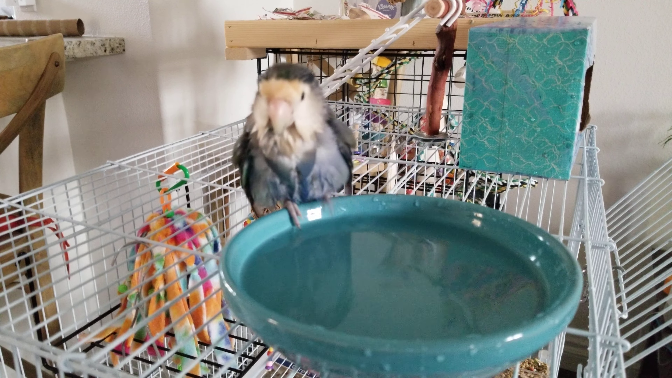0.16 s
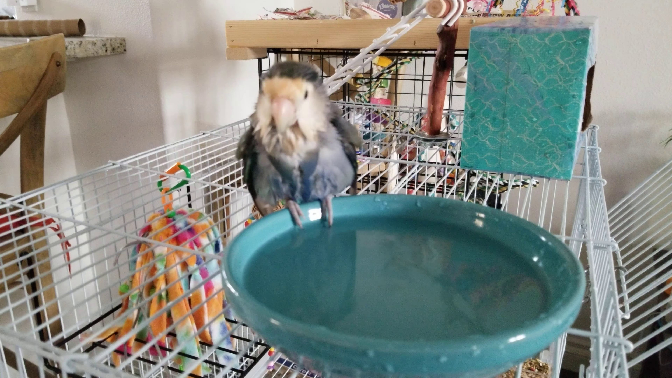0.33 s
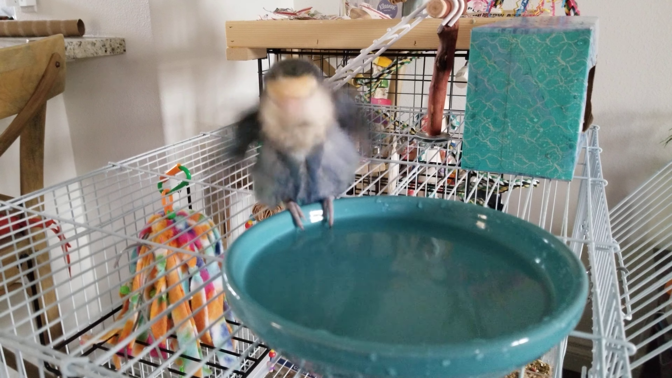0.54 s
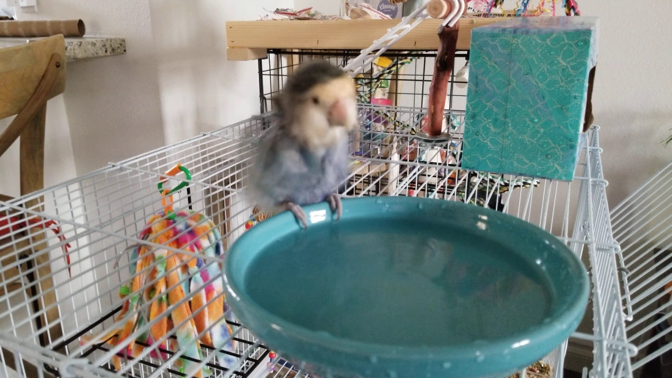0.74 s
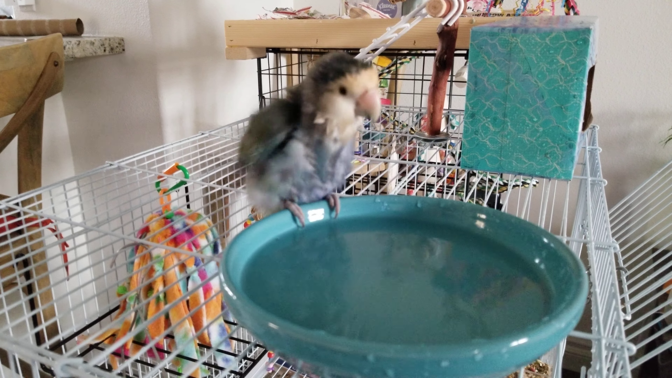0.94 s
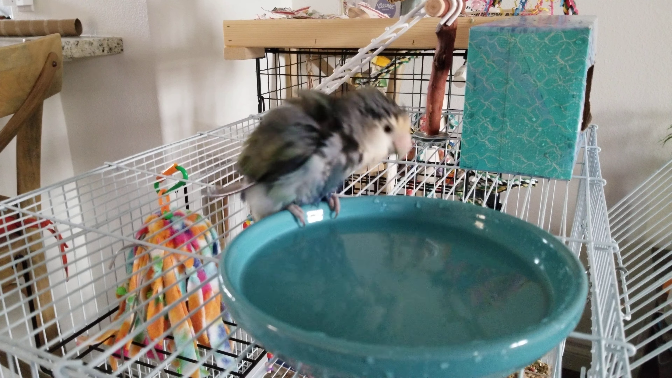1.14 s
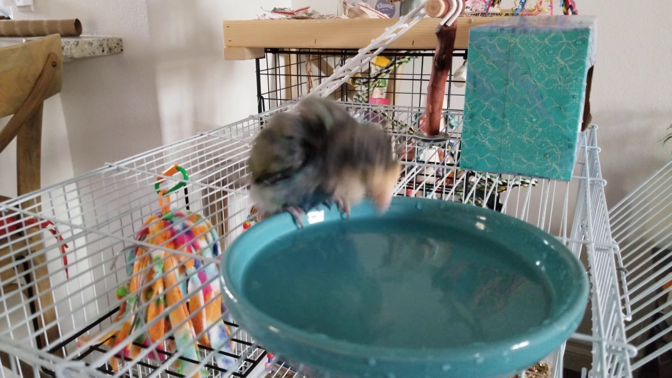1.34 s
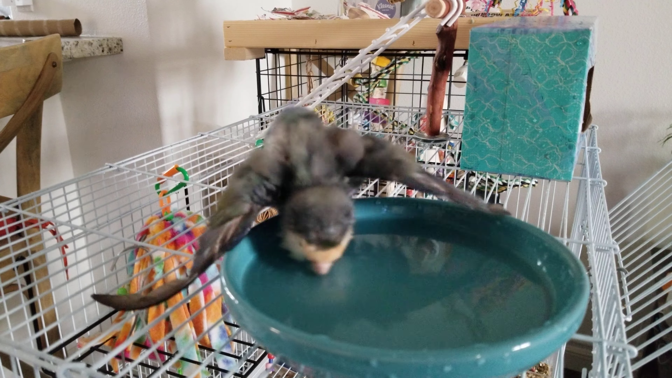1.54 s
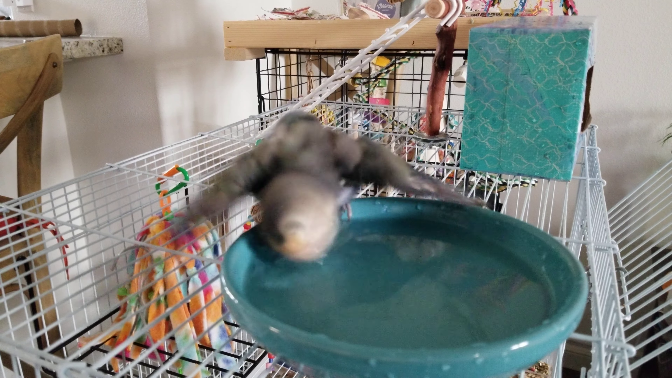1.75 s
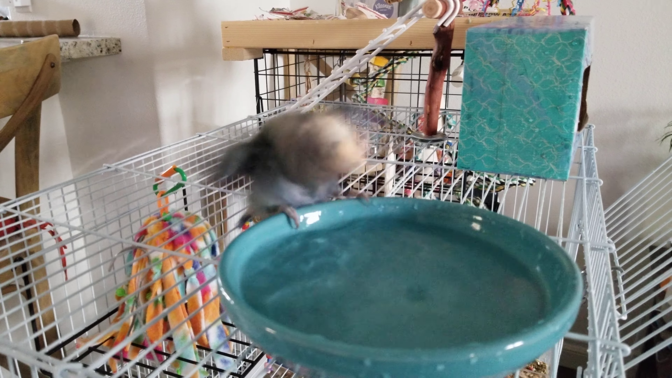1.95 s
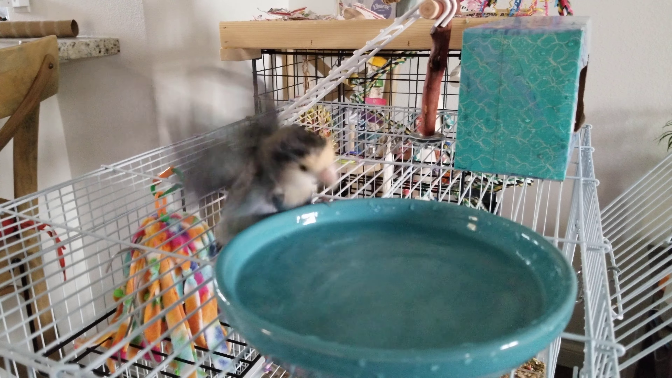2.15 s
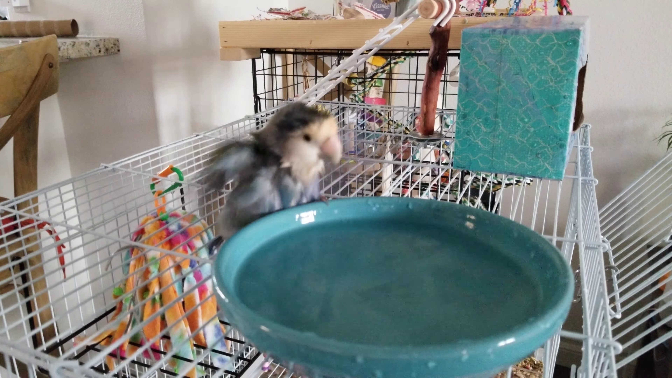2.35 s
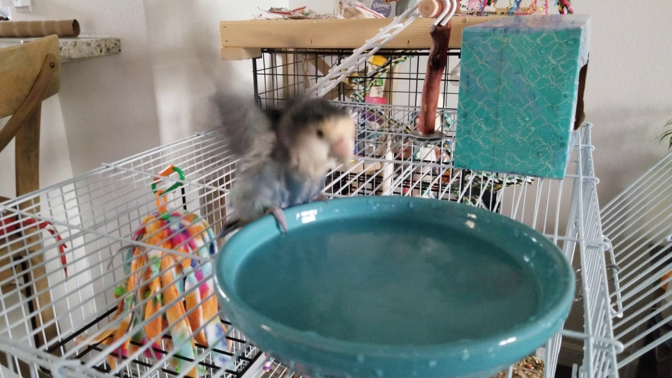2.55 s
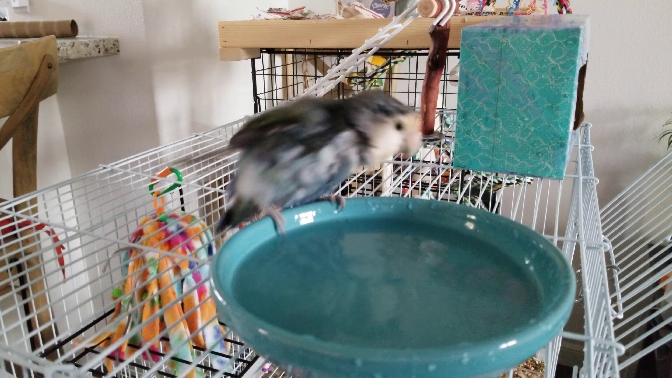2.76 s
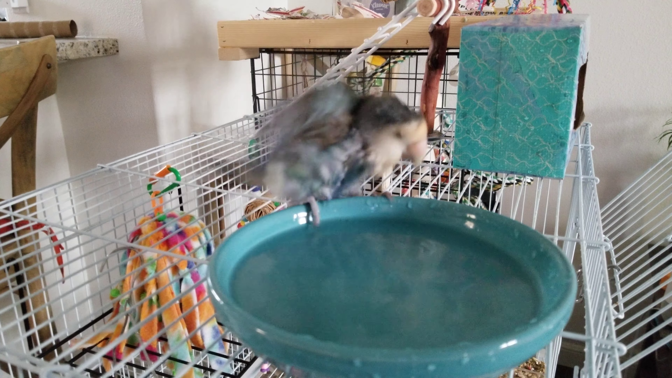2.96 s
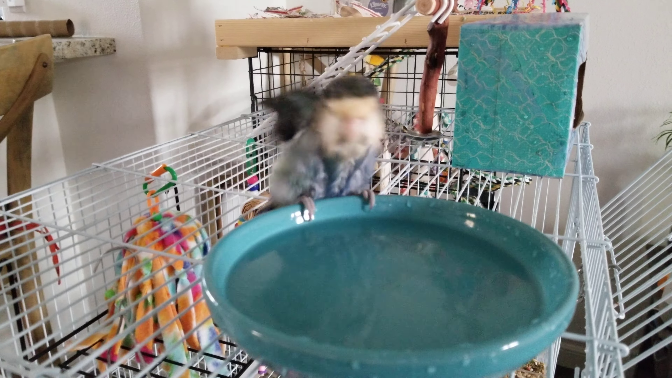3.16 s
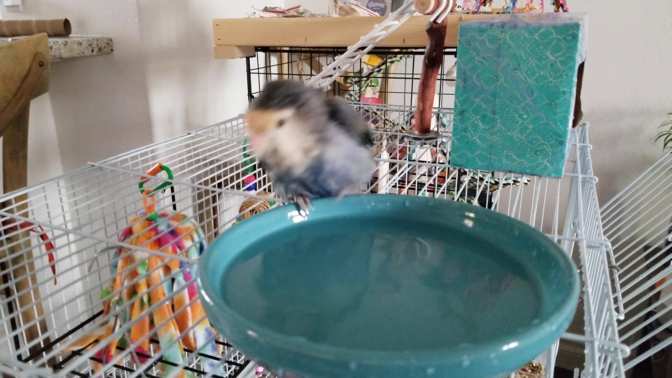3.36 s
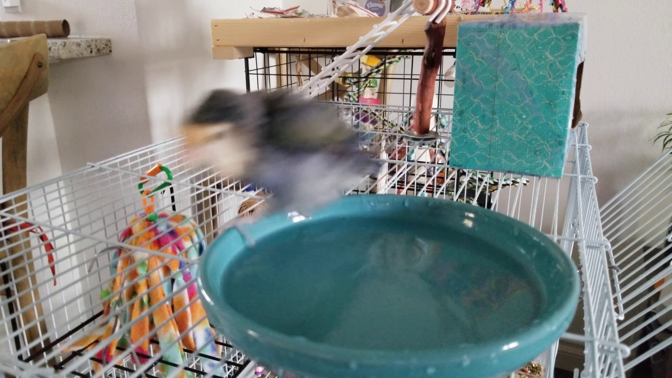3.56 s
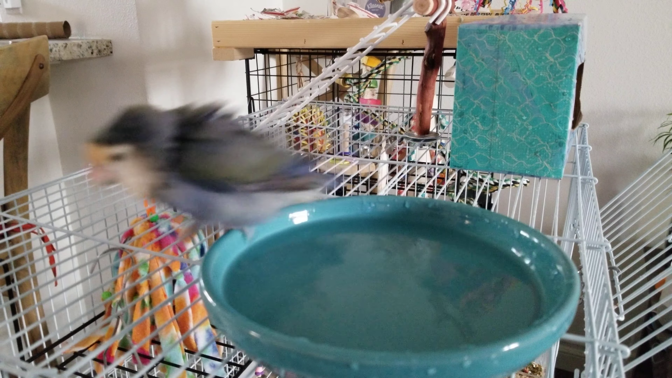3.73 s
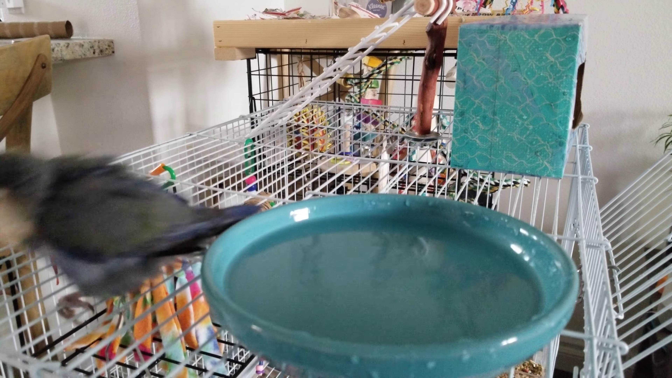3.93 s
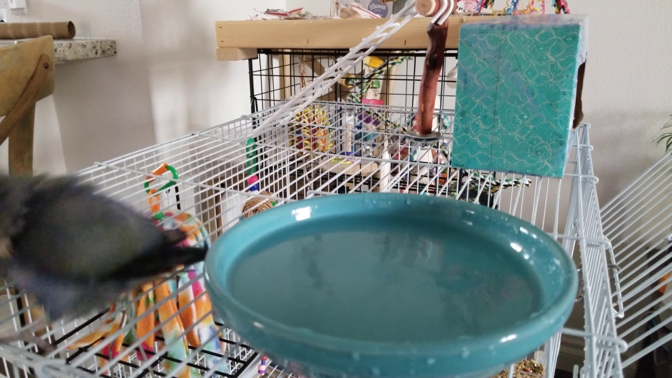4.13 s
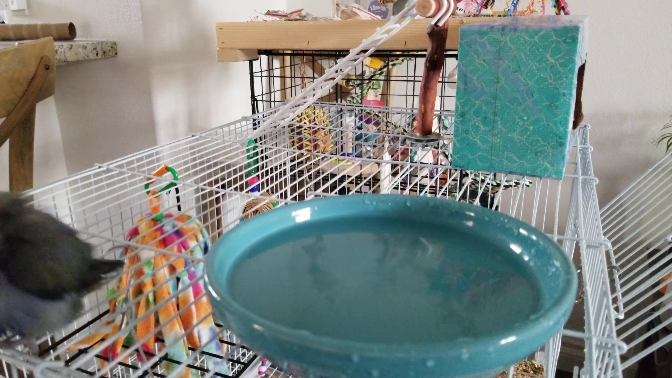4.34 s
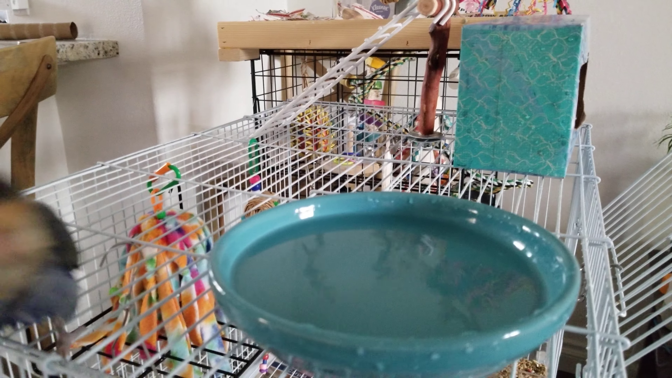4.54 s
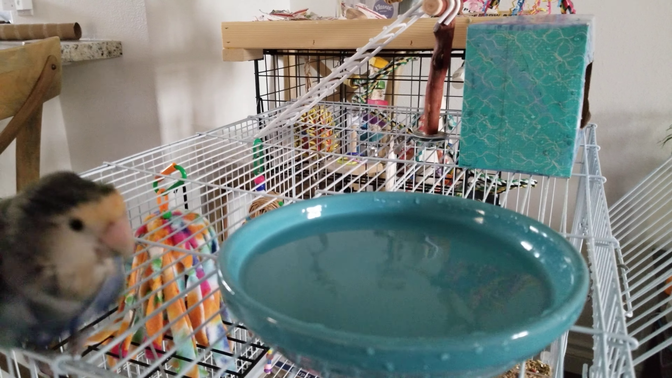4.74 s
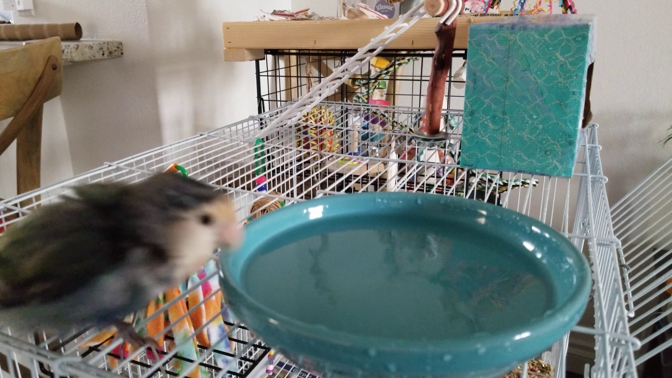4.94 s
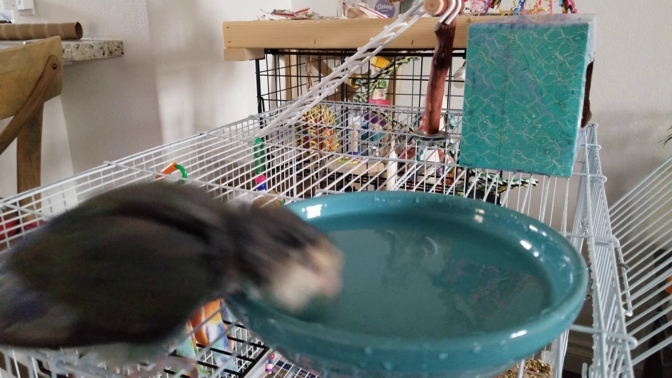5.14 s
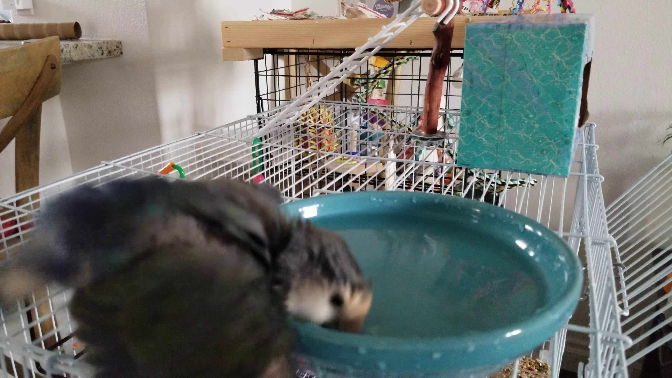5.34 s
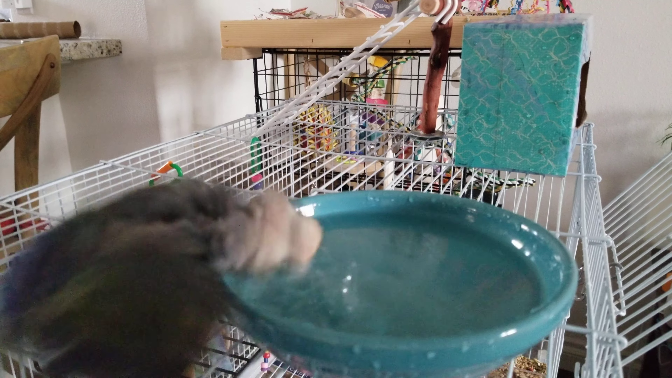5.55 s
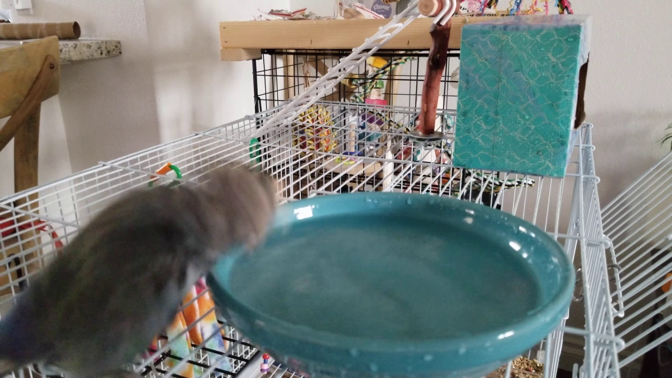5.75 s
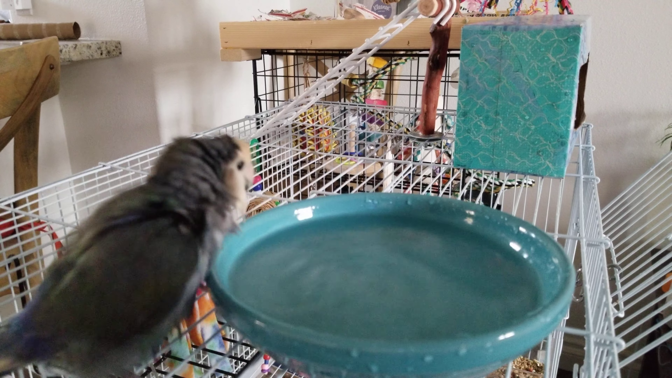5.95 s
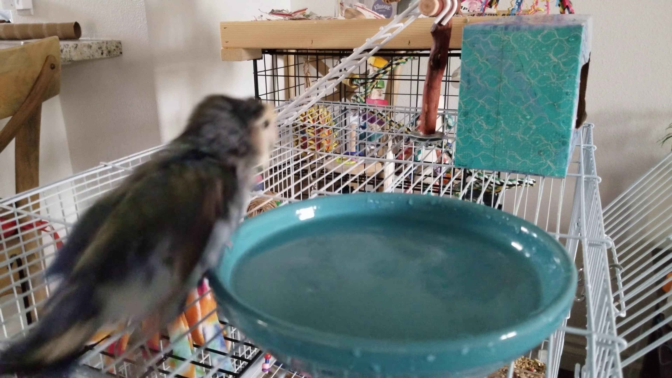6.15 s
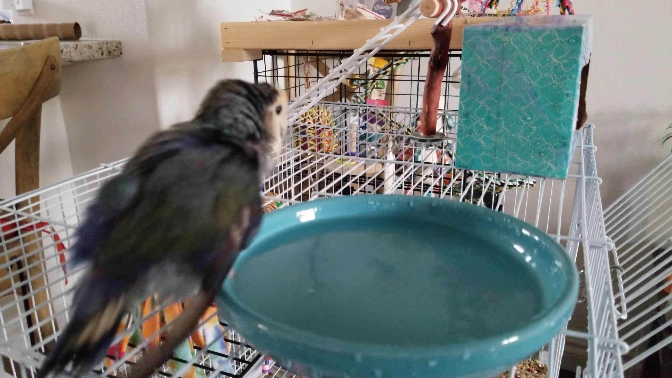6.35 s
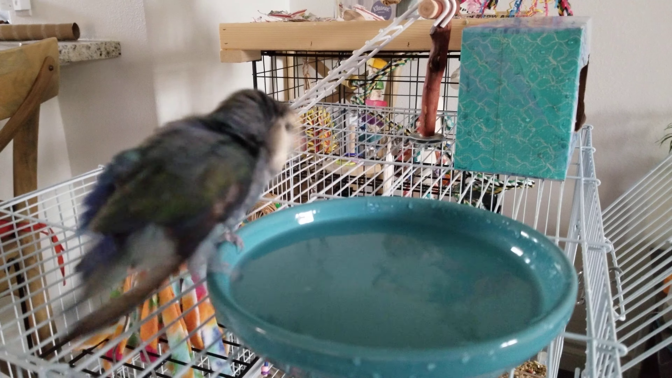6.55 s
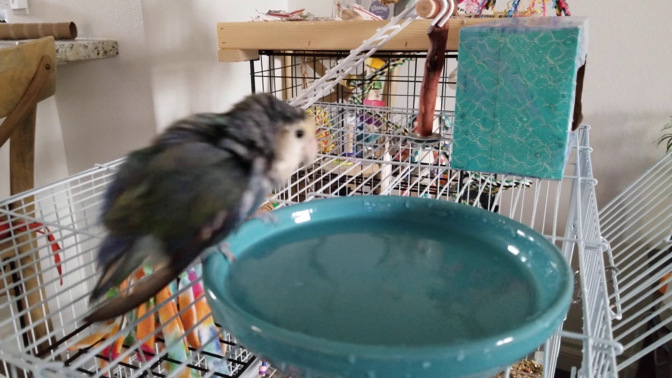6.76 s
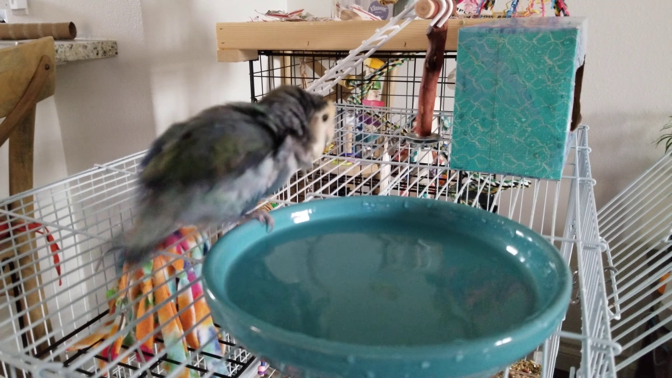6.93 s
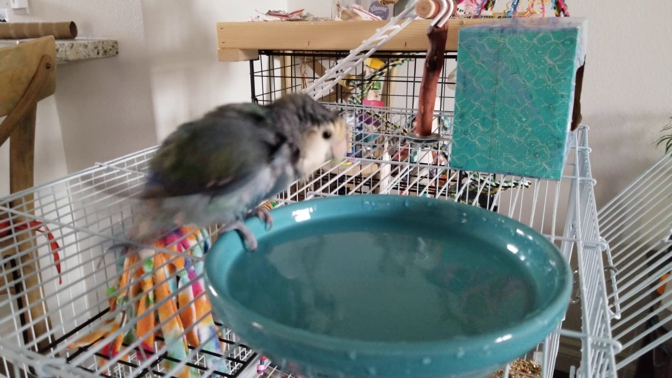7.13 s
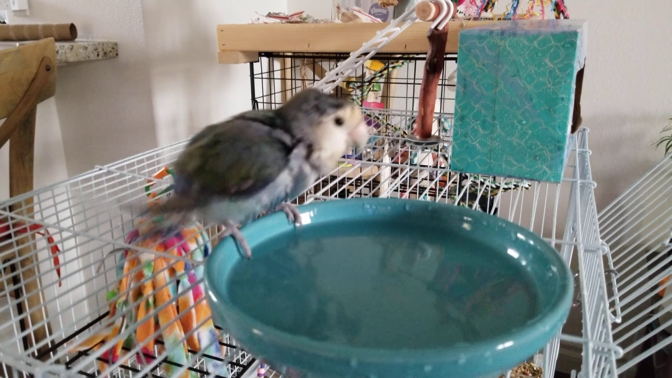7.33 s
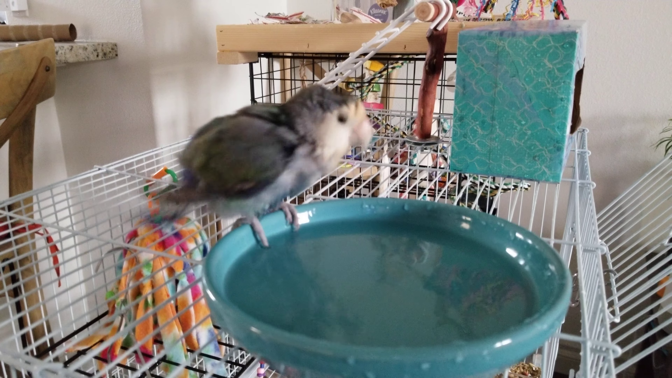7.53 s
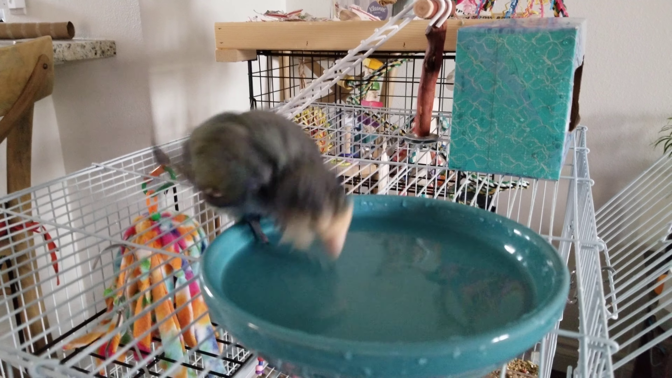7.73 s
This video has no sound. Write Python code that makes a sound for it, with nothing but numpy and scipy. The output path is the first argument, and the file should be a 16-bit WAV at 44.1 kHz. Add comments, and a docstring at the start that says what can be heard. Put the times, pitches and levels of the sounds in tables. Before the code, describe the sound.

Bursts of wet feather rustling and sharp little snaps, with light claw clinks on a ceramic dish and faint traffic rumble indoors.

```python
"""A parrot bathing on a wire cage

A small parrot shakes its wet feathers at a glazed dish on top of a cage. Friction makes the rustle,
wings and drops snap, and claws excite the modes of the dish. The cage wires hum and buzz, and wing wind
thumps on the microphone. Outside a heavy vehicle pulls away through its gears, a thin whistle above it."""
import sys
import numpy as np
from scipy import signal
from scipy.fft import rfft, irfft, next_fast_len
from scipy.io import wavfile

SR = 44100
rng = np.random.default_rng(int(sys.argv[2]) if len(sys.argv) > 2 else 0)


def wav_record(signal):
    """Record a signal, one row per channel, as 16-bit PCM in the file named by sys.argv[1]."""
    frames = np.transpose(np.atleast_2d(signal))
    bounded = np.clip(frames, -1, 1)
    # unit amplitude maps onto the largest positive 16-bit level
    quanta = np.round(bounded * 32767).astype(np.int16)
    wavfile.write(sys.argv[1], SR, quanta)


N = 347949
BASS_LEFT_DB = 5.3   # left over right, for cage hum, wind and background
PORT_LAG_S, ROOM_T60_S = 35e-6, 0.14   # lag of the right microphone port; reverberation time

# Bouts of shaking, bathing and shuffling. Each row: start and length in seconds, then in dB the bright
# rustle, middle rustle, dull wing rush, left over right, shaking of the cage and wind thump.
BOUTS = [(0.154, .2, -78.5, -84.5, -93, 8, -78, -78), (0.591, 0.16, -50, -66, -60, 1, -56, -48),
         (0.715, 0.12, -54.5, -59.5, -56.5, 5, -43, -49.5), (1.26, 0.25, -66.5, -73, -80, 5.5, -67.5, -68),
         (1.82, 0.3, -55.5, -64.5, -69, 4, -49.5, -57.5), (2.077, 0.081, -53.5, -57, -56, 4, -52.5, -53),
         (2.363, 0.02, -54.5, -65, -63, 3, -55, -56), (2.442, 0.071, -48.5, -57, -54.5, 4.5, -45.5, -46.5),
         (2.613, 0.094, -64, -59.5, -63.5, 1, -53.5, -76), (2.97, 0.14, -58.5, -69.5, -66, 4, -57.5, -56),
         (3.943, 0.15, -73, -74, -75, 5, -60, -66), (4.825, .04, -66, -77.5, -83, 4, -69, -60),
         (4.94, 0.046, -71, -72, -84, 4, -74, -68), (5.251, 0.017, -55, -63.5, -64.5, 7.5, -61, -51.5),
         (5.571, 0.15, -57.5, -67, -73, 14, -62, -57), (5.738, .07, -65, -69.5, -68, -4, -56.5, -63),
         (5.98, 0.053, -56.5, -66, -64.5, 6, -59.5, -55), (6.11, 0.14, -63, -62, -75.5, 2.5, -94, -88),
         (6.37, 0.029, -60, -62, -74, 3, -87, -85), (6.872, 0.35, -61, -77.5, -83.5, 5, -84, -61),
         (7.264, 0.94, -60, -74.5, -80, 5, -79, -61)]
def bout_levels(part):
    """Incoherent sources add in power: the dB curve of one part over all bouts, or their balance."""
    start, length, *columns = np.transpose(BOUTS)
    part_db = dict(zip(("bright", "middle", "dull", "left", "shake", "thump"), columns))
    t = np.arange(0, N, 64)[:, None] / SR
    rise, fall, settle = 313, 98, 19.5   # dB per second
    after_db = -np.inf if part in ("shake", "thump") else -14   # only feathers and water settle slowly
    early, late = np.maximum(start - t, 0), np.maximum(t - start - length, 0)
    shape_db = np.maximum(-fall * late, after_db - settle * late) - rise * early
    if part == "left":
        level_db = np.average(part_db["left"] + 0 * t, axis=1,
                              weights=amp(2 * (part_db["bright"] + shape_db)))
    else:
        level_db = 10 * np.log10(amp(2 * (part_db[part] + shape_db)).sum(axis=1))
    return np.interp(np.arange(N) / SR, t[:, 0], level_db)

# Spectra of rustle and wing rush. Each row: frequency in Hz, relative spectral density in dB.
BRIGHT_SPECTRUM = [(5000, -18.5), (8500, -12), (8840, -19), (9610, -15), (12400, -2.5), (15200, -10),
                   (15800, -29)]
MIDDLE_SPECTRUM = [(2000, -13), (3200, -3.5), (4500, 2.5), (6500, -1.5), (8000, -3.5), (9500, -5.5)]
DULL_SPECTRUM = [(400, -1), (800, -3.5), (1500, -1), (2500, -1), (3600, -13.5)]
def feathers():
    """Friction noise: wet feathers rub and shed drops, and all bands flicker together as barbs catch."""
    bright_db, middle_db, dull_db, left_db = map(bout_levels, ("bright", "middle", "dull", "left"))
    catch_db = 2.4 * drift(29.4)
    bright = amp(bright_db + catch_db) * coloured(BRIGHT_SPECTRUM, grains(9000, spread_db=4))
    middle_gain = amp(middle_db + catch_db + 0.5 * drift(1.2))
    middle = middle_gain * coloured(MIDDLE_SPECTRUM, grains(5000, spread_db=3.5))
    dull = amp(dull_db + 0.54 * catch_db + 1.54 * drift(67)) * noise(DULL_SPECTRUM)
    drops = amp(middle_db - 12) * droplets()
    return pan(bright + middle + drops, left_db) + dull

def droplets():
    """Impact ringing: flung drops tick on glaze and wire, a few cycles at one of eight pitches; rms 1."""
    clicks = grains(700, spread_db=6)[0]
    pitch_index = rng.integers(0, 8, N)
    pitches_hz = np.geomspace(2600, 8000, 8)
    ticks = sum(ring(clicks * (pitch_index == k), hz, t60=7.3 / hz) for k, hz in enumerate(pitches_hz))
    return unit_rms(ticks)

# Snaps of wings, drops and feet. Each row: time in seconds, treble peak in dB, then in dB middle over
# treble, low over treble, left over right, bright swish over treble, darker swishes over their bands.
SNAPS = [(0.1281, -45, -31, -29, -4, -23, -11), (0.5556, -15, -12.5, -18.5, 11, -30, -32),
         (0.6041, -25, -21, -21, 10, -40, -28), (0.6393, -13, -8, -12, 9, -27, -26),
         (0.6842, -9.5, 0, -17, 5, -20, -44), (0.6847, -9.5, -33, -13.5, 13, -32, -19.5),
         (0.7263, -22, -16, -9.5, 9, -17, -21), (0.7706, -7, -10, -12.5, 12.5, -27, -32.5),
         (0.8228, -14.5, -11, -11.5, 11, -24, -26), (1.475, -20.5, -13.5, -23, 11, -27, -37),
         (1.6388, -44, -24, -22, 8, -18, -13), (1.7352, -23.5, -13.5, -34, 15, -23, -20),
         (1.767, -28, -13, -24, 23, -37, -18), (1.7945, -13.5, -25, -40, 14, -34, -14),
         (1.7972, -34, 11, -5.5, 6, -26, -27), (1.8283, -28.5, -10, -23, 13, -16.5, -25),
         (1.8834, -31.5, -11, -33, 7, -8, -15), (1.9368, -27, -12, -15, 21, -26, -21),
         (1.9435, -33, -12, -26, 18, -25, -19), (2.002, -39.5, -12, -8, 16, -29, -25),
         (2.0113, -41, 5.5, -6, 9, -17, -20), (2.1778, -20.5, -8, -10, 16, -33, -30),
         (2.2954, -33, 1, -19, 7, -19, -33), (2.3273, -40, 5, -1, 5, -15, -11.5),
         (2.3748, -38, 4.5, -1, 5, -13, -13), (2.4285, -34.5, 9, -3, 6, -18, -27),
         (2.4565, -31, -2, -4.5, 7, -34, -25), (2.5203, -6.5, -13.5, -18, 15, -45, -28),
         (2.5526, -37.5, 10, -17, 10, -15, -27), (2.6467, -44, 9, -0.5, 7, -11, -12),
         (2.9709, -33.5, -16, -27, 23, -19, -13), (3.7495, -52.5, -18, -20, 17, -10, -23),
         (3.9216, -51, -13, -5, 15, -9, -17), (4.0655, -44.5, -21, -31, 13, -5.5, -18),
         (4.1816, -47.5, -2.5, -11, 15, -24, -22), (4.2877, -46, -22, -26, 17, -19, -10),
         (4.3924, -48, -3.5, -10, 34, -23, -32), (4.7042, -48, -16, -19, 17, -12, -12),
         (4.8091, -46.5, -21, -17, 11, -8, -18), (4.9276, -36.5, -17, -39, 12, -17.5, -10),
         (5.0286, -45, -17, -23, 13, -16, -14), (5.2043, -57, 8.5, 7.5, 9, -19, -28),
         (5.2514, -11, -13, -24, 15, -33, -31), (5.3747, -38.5, -7, -7, 16, -25, -16),
         (5.457, -39.5, -11, -34, 12, -25, -13), (5.4783, -38, -11, -28, 10, -14.5, -17),
         (5.5427, -24, -26, -33, 8, -35, -25), (5.5667, -31, -10, -28, 22, -21, -17.5),
         (5.6132, -37, -14, -9, 18, -14, -16), (5.6547, -29, -11, -25, 19, -21, -26),
         (5.6953, -28.5, -10, -21, 19, -29, -22), (5.7799, -40, -1, 0.5, 12, -19, -19.5),
         (5.828, -41, -7, -4, 19, -35, -23), (5.8529, -41.5, -12, -9, 12, -34, -14),
         (5.969, -18, -23, -33, 20, -18, -16), (5.979, -11.5, -14.5, -27, 18, -40, -42),
         (5.9931, -36, -2, -9, 11, -21, -20), (6.0185, -36, 8.5, -7, 7, -20, -28),
         (6.0499, -42.5, 4, -5, 7, -7.5, -17), (6.158, -47, 3, -18, 3, -26, -31),
         (6.1886, -49.5, 2, -10, 6, 0, -14), (6.223, -43, 2, -22, 8, -14, -19),
         (6.3502, -51, 9.5, -17, 6, -23, -26), (6.3665, -39.5, 8.5, -31, 2, -12.5, -26),
         (6.8697, -38, -15, -27, 19, -14, -20), (7.0209, -35, -21, -25, 14, -21, -16),
         (7.069, -41, -17, -20, 12, -16, -20), (7.12, -36, -18, -27, 16, -23, -14),
         (7.1686, -45, -10, -18, 13, -19, -23), (7.2205, -44, -17, -24, 14, -17, -15),
         (7.2585, -34.5, -21, -35, 4, -17.5, -11), (7.3208, -44, -24, -31, 8, -26, -16),
         (7.8266, -43.5, -5, -4.5, 5, -18, -14)]
def snaps():
    """A brief impulse is broadband: a click with spatter in three bands, then a swish of reverberation."""
    times, treble_db, middle_over, low_over, left_db, bright_swish, dark_swish = np.transpose(SNAPS)
    middle_db, low_db = treble_db + middle_over, treble_db + low_over
    direct, t = np.zeros((2, N)), np.arange(600) / SR
    spatter = 0.5 * rng.standard_normal((len(times), len(t))) * np.exp(-t / 0.0005)
    bursts = (t == 0) + spatter
    bands = (([11000, 15000], treble_db, 1), ([3000, 7500], middle_db, 0.4), ([700, 3000], low_db, 0.1))
    for band_hz, level_db, sideways in bands:   # long waves diffract and reach both ports nearly alike
        shaped = signal.sosfilt(signal.butter(2, band_hz, "band", fs=SR, output="sos"), bursts)
        shaped /= np.abs(signal.hilbert(shaped)).max(axis=1, keepdims=True)
        for at, burst, db, left in zip(np.round(times * SR).astype(int), shaped, level_db, left_db):
            direct[:, at:at + len(t)] += pan(amp(db) * burst, sideways * left)
    bright = reverberation(strikes(times, treble_db + bright_swish), BRIGHT_SPECTRUM)
    middle = reverberation(strikes(times, middle_db + dark_swish), MIDDLE_SPECTRUM)
    dull = reverberation(strikes(times, low_db + dark_swish + 0.5), DULL_SPECTRUM)
    return direct + pan(bright, left_db=7.1) + pan(middle, left_db=2.3) + dull

# Claws landing on the rim. Each row: time in seconds, then the drive in dB of five families of modes:
# deep, broad, clear, sharp and thin.
CLAW_STRIKES = [(0.1194, -86, -94, -77, -79, -54), (0.229, -97, -80, -68, -72, -58),
                (0.635, -63, -58, -69, -52, -44), (0.684, -62, -59, -37.5, -45, -37),
                (0.771, -50, -62, -47, -44, -41), (0.8218, -61, -70, -41.5, -72, -57),
                (1.104, -88, -84, -61, -92, -88), (1.138, -107, -86, -61, -83, -52),
                (1.3123, -93, -88, -73, -62, -66), (1.3665, -81, -71, -57, -80, -37),
                (1.4113, -78, -66, -66, -68, -61), (1.472, -72, -62, -67, -81, -67),
                (1.8383, -69, -60, -70, -49.5, -64), (1.885, -63, -54, -44, -47, -36),
                (2.049, -48, -50.5, -45, -59, -50), (2.066, -55, -50.5, -45, -43.5, -29.5),
                (2.0974, -72, -48.5, -61, -44.5, -45), (2.454, -68, -71, -62, -55, -60),
                (2.6304, -63, -58, -57, -58, -38), (2.865, -65.5, -62, -48.5, -62, -49),
                (2.951, -80, -69, -55.5, -61, -47), (3.011, -75, -87, -54, -58, -37),
                (3.11, -88, -64, -62, -60.5, -49), (3.438, -100, -91, -83, -74, -79),
                (3.574, -79, -78, -62, -52, -46), (3.6384, -93, -75, -62, -64.5, -47),
                (3.7933, -82, -95, -77, -63, -52), (4.069, -89, -70, -85, -84, -72),
                (4.81, -88, -83, -73, -61, -68), (5.279, -72, -69, -54, -61, -51),
                (5.475, -86, -87, -65, -70, -80), (5.612, -81.5, -71, -58, -54.5, -48),
                (6.1, -76, -60, -47, -49, -39), (6.1925, -74, -66, -46.5, -48.5, -34.5),
                (6.272, -99, -66, -55, -55, -41), (6.396, -90, -62, -67, -57.5, -47),
                (6.6302, -79, -60.5, -55, -53, -41), (6.6433, -77, -63, -66, -66, -42),
                (6.755, -99, -75, -64, -74, -70.5), (6.7894, -103, -86, -68, -63.5, -48),
                (7.0724, -82, -70, -62, -62, -63), (7.2624, -85, -92, -60, -63, -48),
                (7.337, -87, -84, -65, -76, -48), (7.4058, -100, -83, -64, -70, -49),
                (7.74, -76, -77, -55, -56.5, -70), (7.828, -64, -51.5, -60, -57, -56)]
# Modes of the dish. Each row: frequency in Hz, gain in dB, time to decay by 60 dB in seconds.
DISH_MODES = [(1843, 3, .16), (3120, 0, .15), (4163, 0, .11), (4963, 3, .14), (6557, 0, .12),
              (7192, -5, .1), (8158, -10, .1), (9177, 0, .11), (10260, -18, .08), (10740, -18, .08),
              (11780, -11, .1), (12080, -5, .09), (12480, -12, .09), (13040, -17, .09), (14640, -16, .08),
              (15270, -2, .1), (15660, -8, .09)]
# Each entry: the column of CLAW_STRIKES that drives the corresponding mode.
MODE_FAMILY = [1, 2, 3, 2, 4, 4, 4, 4, 5, 5, 5, 5, 5, 5, 5, 4, 4]
def dish_clinks():
    """Modal vibration: where a claw lands sets each mode's strength; slopping water makes it waver."""
    claws, direct = np.array(CLAW_STRIKES), np.zeros(N)
    touch_s = 0.025   # the claw slides a moment, so the ring swells
    scatter_db = 2 * rng.standard_normal((len(claws), len(DISH_MODES)))
    wavers = [amp(2.2 * drift(40)) for _ in range(3)]
    for k, (hz, gain_db, t60) in enumerate(DISH_MODES):
        drive_db = claws[:, MODE_FAMILY[k]] + scatter_db[:, k] + gain_db
        touch = ring(strikes(claws[:, 0], drive_db), hz, touch_s) / decay_energy(touch_s)
        direct += wavers[k % 3] * ring(touch, hz, t60)
    reflected = reverberation(direct, [(1000, 0.019), (16000, 0.004)]) / np.sqrt(decay_energy(ROOM_T60_S))
    return pan(direct, left_db=5) + amp(-8) * reflected

# Landings and steps on the cage top. Each row: time in seconds, level in dB.
FOOTFALLS = [(3.755, -70), (3.924, -60), (3.97, -77), (4.065, -88), (4.929, -107), (5.03, -77)]
# Resonances of short wires and clips. Each row: frequency in Hz, bandwidth in Hz, gain in dB.
RATTLE_MODES = [(806, 550, 2), (1273, 100, -1), (1694, 110, -15), (2900, 59, -10), (4600, 550, -13.5),
                (6980, 96, -9.5), (10100, 290, -10)]
def wire_rattle():
    """Repeated collisions: a footfall sets loose wires buzzing against each other as the motion decays."""
    t60 = 0.77
    envelope = signal.lfilter([1], [1, -amp(-60 / (t60 * SR))], strikes(*np.transpose(FOOTFALLS)))
    contacts = grains(3000, spread_db=3.5)
    buzz = sum(amp(db) * unit_rms(ring(contacts, hz, t60=1.7 / width)) for hz, width, db in RATTLE_MODES)
    return envelope * buzz

# Modes of the long wires. Each row: frequency in Hz, gain in dB, time to decay by 60 dB in seconds.
WIRE_MODES = [(460, -9, 0.74), (515.3, -2, 0.44), (549, -5, 1), (602, 1, 0.54)]
def cage_hum():
    """Forced resonance: shaking drives the long wires at random, and they ring on freely afterwards."""
    force = amp(bout_levels("shake") - 42.5)
    hum = sum(amp(db) * ring(force * rng.standard_normal(N), hz, t60) for hz, db, t60 in WIRE_MODES)
    return pan(hum, BASS_LEFT_DB)

# Spectrum of wing wind and rumble. Each row: frequency in Hz, relative spectral density in dB.
THUMP_SPECTRUM = [(20, -27), (45, 1), (90, -3.5), (200, -11.5), (400, -16.5), (800, -28.5)]
# Traffic rumble through the floor. Each row: time in seconds, level in dB.
TRAFFIC_RUMBLE = [(0, -68), (1.7, -69), (3.3, -63), (5.9, -63.5), (6.6, -60.5), (7.89, -57)]
def wind_and_rumble():
    """Slow pressure fluctuations: wing beats push air on the ports, adding in power to traffic rumble."""
    rumble_db, = curves(TRAFFIC_RUMBLE)
    pressure = np.hypot(amp(bout_levels("thump")), amp(rumble_db))
    return pan(noise(THUMP_SPECTRUM) * pressure * amp(1.5 * drift(13)), BASS_LEFT_DB)

# The engine, one list a gear. Each row: time in seconds, firing rate in Hz, then the levels in dB of
# orders 1, 1/2, 2 and 3 of that rate.
ENGINE_GEARS = [
    [(0.85, 108.6, -51, -81, -84, -69), (1.108, 116.6, -109, -80, -82, -95),
     (2.132, 112.5, -48.5, -76, -93.5, -81), (2.35, 107.8, -62, -94, -74, -75)],
    [(2.4, 83.14, -58.5, -81, -77, -90), (3.25, 85.1, -62.5, -75, -83, -96),
     (4.2, 96.2, -60.5, -81, -89, -70.5), (4.37, 103.9, -59.5, -94.5, -75, -74.5),
     (5.49, 117, -56.5, -88, -77.5, -76.5), (5.62, 113.4, -63.5, -74, -73, -91)],
    [(5.7, 93.8, -51, -51, -72, -76), (5.81, 95.83, -62, -62, -88, -78.5),
     (6.96, 100.6, -55, -51.5, -70, -68), (7.86, 99.4, -49, -91, -64.5, -72.5),
     (7.89, 104, -45, -53, -61, -69)],
]
def engine():
    """Periodic firing makes a series of orders; the low ones come through the wall, gear by gear."""
    t, out = np.arange(N) / SR, np.zeros(N)
    overhang_s, fade_s = 0.326, 0.0305
    for gear in ENGINE_GEARS:
        firing_hz, *orders_db = curves(gear)
        start, end = gear[0][0], gear[-1][0] + overhang_s
        engaged = np.clip(np.minimum(t - start, end - t) / fade_s, 0, 1)
        phase = 2 * np.pi * np.cumsum(firing_hz) / SR
        for order, db in zip((1, 0.5, 2, 3), orders_db):
            height = engaged * np.sqrt(2) * amp(db + 1.1 * drift(33))
            out += height * np.sin(order * phase + rng.uniform(0, 2 * np.pi))
    return pan(out, BASS_LEFT_DB)

# Pitch of the whistle from the street. Each row: time in seconds, frequency in Hz.
WHISTLE_PITCH = [(0, 12800), (1.3, 12750), (2.8, 12900), (3.2, 13100), (3.6, 12620), (4.0, 12420),
                 (4.45, 12340), (4.9, 12600), (5.2, 12450), (5.9, 12500)]
def whistle():
    """Random frequency and amplitude modulation: one thin tone wavers far above the engine."""
    hz, = curves(WHISTLE_PITCH)
    cycles = np.cumsum(hz + 40 * drift(30)) / SR
    lead_cycles = hz * [[0], [PORT_LAG_S]]   # offsets the port lag: the whistle reaches both at once
    sounding = np.arange(N) / SR < WHISTLE_PITCH[-1][0]
    height = np.sqrt(2) * amp(-83 + 2 * drift(5)) * sounding
    return pan(height * np.sin(2 * np.pi * (cycles + lead_cycles)), BASS_LEFT_DB)

# Background of the room. Each row: frequency in Hz, relative spectral density in dB.
ROOM_SPECTRUM = [(15, -31), (25, -24), (102, 2.5), (170, -23.5), (292, -11.5), (372, -20.5), (449, -8),
                 (588, -22.5), (1120, -30), (2150, -34.5), (3590, -42.5), (6680, -36.5), (8520, -47.5),
                 (12400, -26.5), (15800, -35)]
def room_tone():
    """Ambient noise: a faint, low background whose level flickers slightly."""
    return pan(amp(-62 + 0.89 * drift(9.8)) * noise(ROOM_SPECTRUM), BASS_LEFT_DB)

def reverberation(x, spectrum):
    """Convolution with the room's response: exponentially decaying noise, different in each ear."""
    t = np.arange(SR // 2) / SR
    tail = noise(spectrum, len(t)) * amp(-60 * t / ROOM_T60_S) * (t > 0.002)
    return signal.oaconvolve(x[None], tail, axes=1)[:, :N]

# Likeness of the two channels. Each row: frequency in Hz, left-right correlation from -1 to 1.
COHERENCE = [(30, 0.8), (300, 0.67), (1000, 0.058), (2000, -0.031), (12000, 0.013)]
def coloured(spectrum, source):
    """Partial coherence: two independent signals are filtered into mid and side; the mid has rms 1."""
    length = source.shape[1]
    size = next_fast_len(length)
    hz = np.maximum(np.fft.rfftfreq(size, 1 / SR), 1)
    alike = at_hz(COHERENCE, hz)
    gain = amp(at_hz(spectrum, hz)) * (hz > spectrum[0][0]) * (hz < spectrum[-1][0])
    mid, side = irfft(rfft(source, size) * gain * np.sqrt([1 + alike, 1 - alike]), size)[:, :length]
    return np.array([mid + side, mid - side]) / np.sqrt(np.mean(mid ** 2))

def noise(spectrum, length=N):
    """Gaussian stereo noise filtered to a spectrum."""
    return coloured(spectrum, rng.standard_normal((2, length)))

def grains(per_s, spread_db):
    """Shot noise: two channels of random clicks of uneven size."""
    sizes = amp(spread_db * np.minimum(rng.exponential(1, (2, N)), 5)) * rng.choice([-1, 1], (2, N))
    return sizes * (rng.random((2, N)) < per_s / SR)

def strikes(times, levels_db):
    """An impulse train, with times in seconds."""
    out = np.zeros(N)
    out[np.round(times * SR).astype(int)] = amp(levels_db)
    return out

def ring(drive, hz, t60):
    """A damped oscillator: a unit impulse starts a sine of height 1 that falls 60 dB in t60 seconds."""
    decay, step = amp(-60 / (t60 * SR)), 2 * np.pi * hz / SR
    return signal.lfilter([0, np.sin(step)], [1, -2 * decay * np.cos(step), decay ** 2], drive + 1e-18)

def decay_energy(t60):
    """Sum of the squared samples of an exponential decay from height 1."""
    return SR * t60 / (6 * np.log(10))

def drift(rate_hz):
    """Slow random modulation: low-passed noise of rms 1."""
    hop, warm_up = 40, 2000
    pole = np.exp(-2 * np.pi * rate_hz * hop / SR)
    white = rng.standard_normal(N // hop + warm_up + 2)
    slow = signal.lfilter([1], [1, -2 * pole, pole ** 2], white)[warm_up:]
    return np.interp(np.arange(N) / hop, np.arange(len(slow)), unit_rms(slow))

def pan(x, left_db):
    """Level difference gives direction: left exceeds right by left_db, at a mean gain of 1."""
    half = amp(left_db / 2)
    return x * np.array([half, 1 / half]).reshape(2, -1) * 2 / (half + 1 / half)

def curves(rows):
    """Columns of a timed table, interpolated to one value a sample."""
    times, *columns = np.transpose(rows)
    return [np.interp(np.arange(N) / SR, times, column) for column in columns]

def at_hz(points, hz):
    """Interpolation on a logarithmic frequency axis."""
    known_hz, values = np.transpose(points)
    return np.interp(np.log(hz), np.log(known_hz), values)

def amp(db):
    """Amplitude ratio of a level in dB."""
    return 10 ** (np.asarray(db) / 20)

def unit_rms(x):
    """The signal scaled to rms 1."""
    return x / np.sqrt(np.mean(x ** 2) + 1e-20)

def scene():
    """Superposition: bird, dish and cage close by, street and room tone behind."""
    room = room_tone()
    bird = feathers() + snaps() + dish_clinks()
    cage = wire_rattle() + cage_hum()
    return bird + cage + wind_and_rumble() + engine() + whistle() + room

def record(dry):
    """Path difference delays the right port; the housing absorbs one band, and a low-pass cuts the top."""
    size = next_fast_len(N)
    hz = np.fft.rfftfreq(size, 1 / SR)
    dip_hz, dip_width_hz, dip_depth, stopband_hz = 8330, 1490, 0.58, 17200
    dip = 1 - dip_depth * np.exp(-(2 * (hz - dip_hz) / dip_width_hz) ** 2)
    delay = np.exp(-2j * np.pi * hz * [[0], [PORT_LAG_S]])
    ports = irfft(rfft(dry, size) * dip * delay, size)[:, :N]
    return signal.sosfilt(signal.cheby2(12, 70, stopband_hz, fs=SR, output="sos"), ports)

dry = scene()
out = record(dry)
wav_record(out)
```